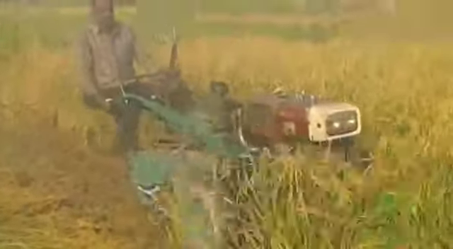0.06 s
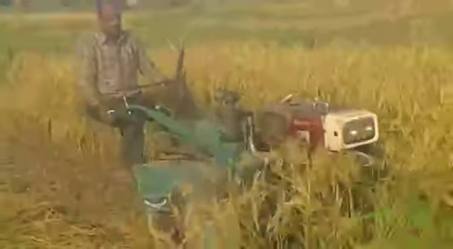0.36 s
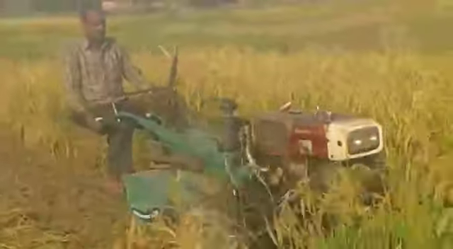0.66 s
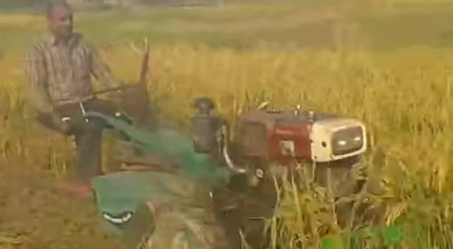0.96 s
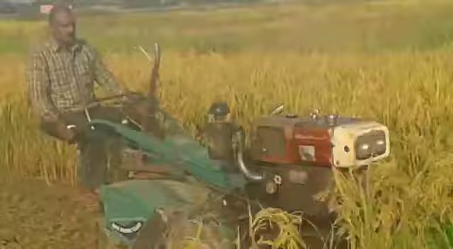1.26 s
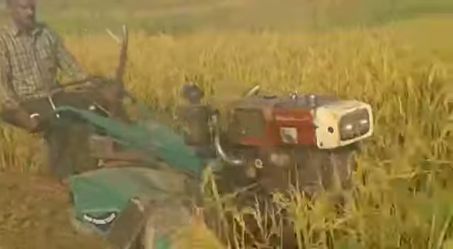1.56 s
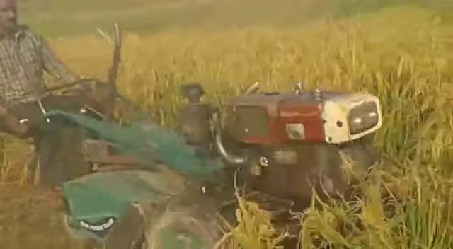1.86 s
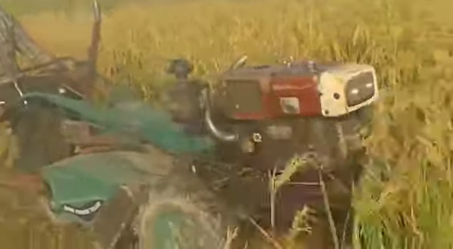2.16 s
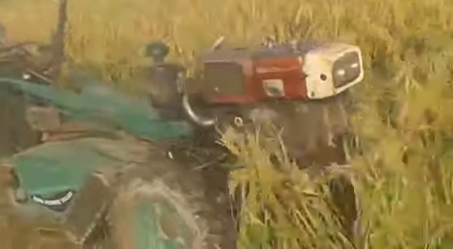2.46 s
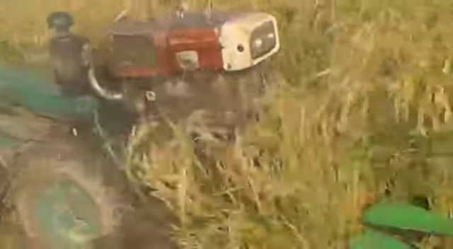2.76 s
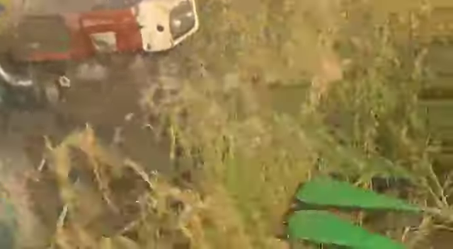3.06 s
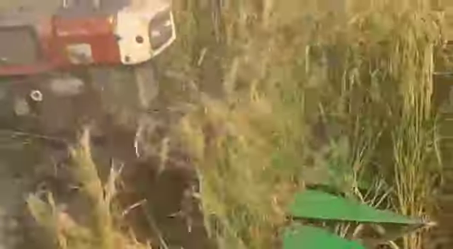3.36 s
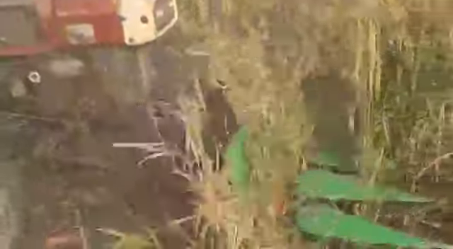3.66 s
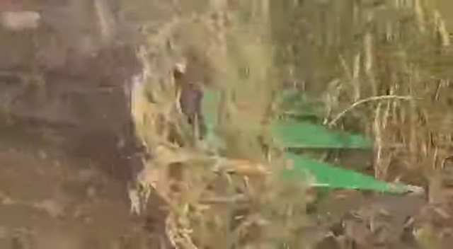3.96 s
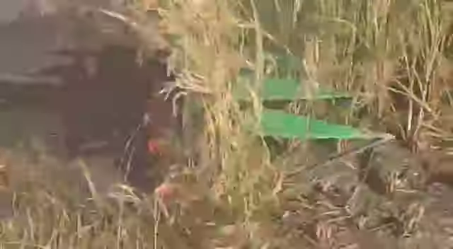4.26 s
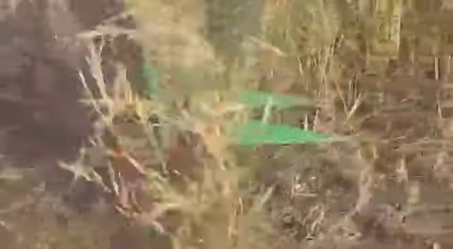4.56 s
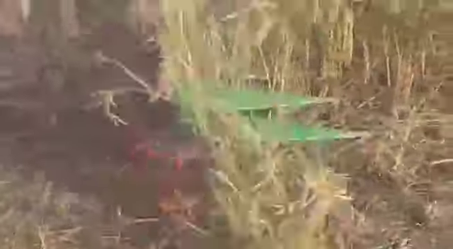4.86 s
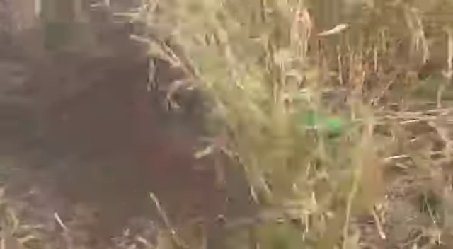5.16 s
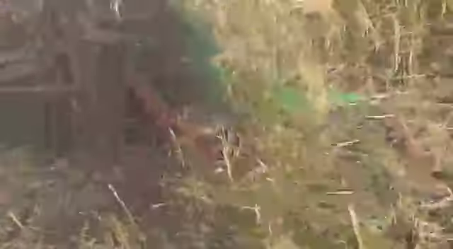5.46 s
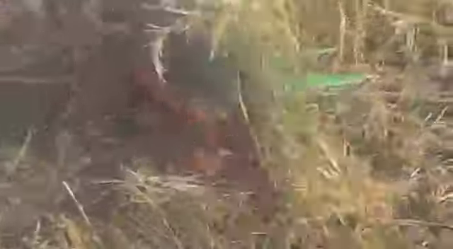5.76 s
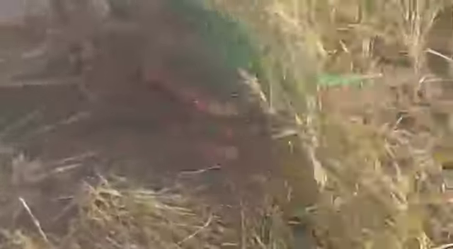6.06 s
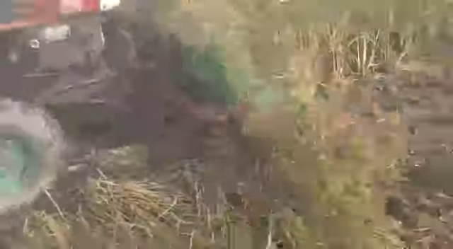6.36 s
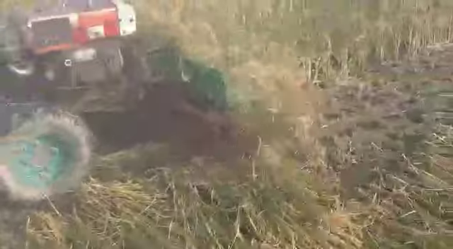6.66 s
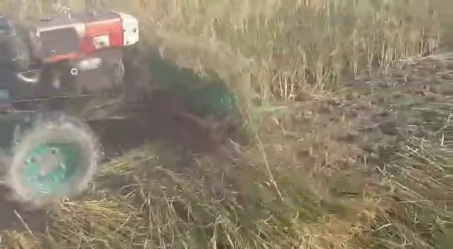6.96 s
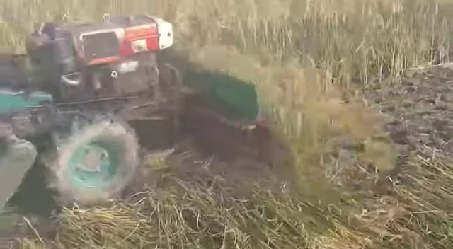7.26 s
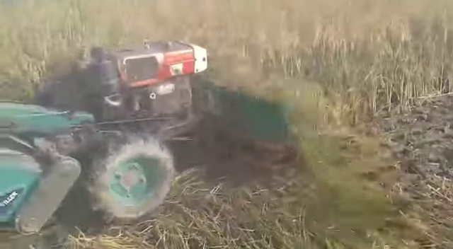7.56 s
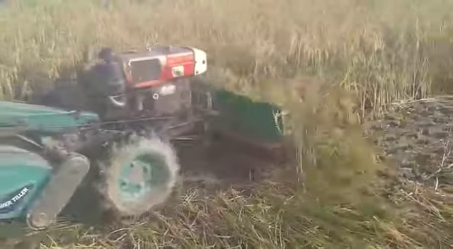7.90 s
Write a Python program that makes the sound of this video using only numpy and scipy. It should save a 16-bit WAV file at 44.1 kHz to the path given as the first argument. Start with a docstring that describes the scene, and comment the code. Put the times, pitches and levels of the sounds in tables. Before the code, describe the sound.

A single-cylinder diesel tiller runs steadily close by, its reaper blades chattering in a harsh metallic hiss with sharp clanks.

```python
"""Power tiller reaping, close by.

A single-cylinder diesel tiller drives a front reaper through standing crop past a phone, heard from
the front, the side, then the rear. Loose steel of the cutter and its drive chatters in step with the
engine and rings like a harsh hiss; each firing jolts it. Beneath, the exhaust thuds, the casing drones."""
import sys
import numpy as np
from scipy import signal
from scipy.fft import rfft, irfft, next_fast_len
from scipy.io import wavfile
from scipy.ndimage import uniform_filter1d, minimum_filter1d, map_coordinates

SR = 44100
rng = np.random.default_rng(int(sys.argv[2]) if len(sys.argv) > 2 else 0)


def store_wav(level_fs):
    """Save 16-bit WAV to argv[1]."""
    pcm = np.round(np.clip(np.atleast_2d(level_fs), -1, 1) * 32767)
    wavfile.write(sys.argv[1], SR, pcm.T.astype(np.int16))


N = 358533


# rattle bouts in each cycle: place/cycles, width/cycles, level/dB re steady chatter
RATTLE_BOUTS = [(.12, .02, -2), (.28, .03, -.5), (.415, .036, 4.5), (.67, .033, -3.5), (.82, .042, -2.3),
                (.955, .025, -1)]
# cutter bar and guard modes: f/Hz, width/Hz, level/dB at front, flank, rear quarter, rear
CUTTER_MODES = [(3049, 160, -18.5, -18.5, -14, -16.5), (3316, 547, -14.5, -10.5, -6.5, -18),
                (3900, 540, -10.5, -5, -7, -6.5), (4318, 630, 1, -0.5, 1, -7),
                (4600, 410, -10, -0.5, 1, -3.5), (4865, 240, -7, -5, 2, -1.5),
                (5130, 290, -3.5, -5.5, 3.5, -5.5), (5330, 710, -2, 1, 2, -1),
                (5850, 870, -2, -0.5, 2, -4.5), (6590, 910, -7, -4.5, -0.5, -8.5),
                (7625, 940, -8.0, -3.5, -4, -12), (8800, 2000, -14, -13, -9, -18.5),
                (10150, 1800, -22, -18, -15.5, -22.5), (11100, 3600, -18.5, -16, -17, -23.0)]
# cutter during the pass: t/s, level/dB
CUTTER_DB = [(0.1, -18.5), (1.21, -17.5), (1.46, -19), (2.1, -17), (4.42, -18), (5.0, -16), (5.69, -17.5),
             (6.18, -16), (8.1, -16.5)]

def cutter(cycle, bout_scatter_db=0.8, straw_db=-4, shielding_db=-1.8, full_hz=5200):
    """Steel parts chatter in bouts as the engine shakes them; straw rubs along the guards throughout."""
    bouts = np.zeros(N)
    for place, width, db in RATTLE_BOUTS:
        turn, offset = np.divmod(cycle - place + 1.5, 1)
        force = undb(db + bout_scatter_db * rng.standard_normal(256))[turn.astype(int)]
        bouts += force ** 2 * np.exp(-.5 * ((offset - .5) / width) ** 2)
    # from behind, the machine hides the bouts
    shake = 1 + bouts * undb(shielding_db * (view() - 0.5)) ** 2
    chatter = impacts(rate_hz=260, scatter_db=1.7, ring_s=0.003, order=6) + undb(straw_db) ** 2
    strength = np.sqrt(shake * chatter)

    def drive(hz):
        """Light, high-ringing parts follow every blow; heavier ones respond more evenly."""
        exponent = min(hz / full_hz, 1.05) ** 0.95
        return strength ** exponent * rng.standard_normal(N)

    return radiate(drive, CUTTER_MODES) * undb(curve(CUTTER_DB))


# hard slams of the drive: t/s, level/dB
DRIVE_SLAMS = [(0.4068, -21), (0.8594, -21.5), (0.9363, -22.5), (1.9964, -20), (2.2228, -19),
               (2.3037, -19.5), (2.5294, -19.5), (3.2924, -19), (3.5144, -19), (3.7447, -18.5),
               (3.895, -20), (4.4273, -19.5), (4.8833, -18), (7.0165, -20)]

def strokes(cycle, place=.385, jitter_cycles=.015, side_db=(-30.5, -30, -30, -31), scatter_db=4.5):
    """One uneven blow per engine cycle; a slam replaces the blow of its cycle."""
    turns = np.arange(int(cycle[-1]))
    late, force = rng.standard_normal((256, 2))[turns].T
    at = np.searchsorted(cycle, turns + place + jitter_cycles * late).clip(0, N - 1)
    db = np.interp(view()[at], np.arange(len(side_db)), side_db) + scatter_db * np.clip(force, -2, 1)
    for time_s, slam_db in DRIVE_SLAMS:
        turn = int(cycle[int(time_s * SR)])
        at[turn], db[turn] = int(time_s * SR), slam_db
    return np.bincount(at, undb(db), N)


# clank spectrum: f/Hz, relative level/dB
CLANK_SPECTRUM = [(1500, -36), (3200, -3), (4500, -16), (6000, 12.5), (7800, 13), (9800, 6), (12000, -4.5),
                  (15000, -17)]
# knife section tones: f/Hz, width/Hz, level/dB re crash
KNIFE_MODES = [(8950, 160, -18), (9680, 140, -18)]

def clanks(cycle, crack_s=0.00088, crack_db=-6, ring_s=0.016):
    """The slack of the drive snaps shut each stroke: a crack, a bright crash of steel, a faint clink."""
    age_s = np.arange(SR // 10) / SR
    decay = undb(crack_db) * np.exp(-age_s / crack_s) + np.exp(-age_s / ring_s)
    strength = signal.fftconvolve(strokes(cycle), decay)[:N]
    knots_hz, knots_db = np.transpose(CLANK_SPECTRUM)
    size = next_fast_len(N)
    bins_hz = np.fft.rfftfreq(size, 1 / SR)
    colour = undb(np.interp(np.log(bins_hz + 1), np.log(knots_hz), knots_db))
    ring = irfft(rfft(rng.standard_normal(size)) * colour, size)[:N]
    crash = strength * ring / np.std(ring)
    clink = sum(undb(db) * resonance(crash, hz, width) for hz, width, db in KNIFE_MODES)
    return crash + np.std(crash) * clink


# pipe and silencer modes: f/Hz, width/Hz, level/dB at front, flank, rear quarter, rear
EXHAUST_MODES = [(78, 40, -15.5, -15, -17, -15.5), (117, 41, -6.5, -7, -7.5, -8),
                 (163, 59, -5, -8, -9, -3.5), (213.4, 42, 1.5, -4, -4, -7), (274.4, 92, 1, -3, -1, -1),
                 (371, 163, 2, -1, -1, -0.5), (470, 102, -3.5, -1, -2, -9), (538, 58, -10.5, -4, -4, -5)]
# exhaust during the pass: t/s, level/dB
EXHAUST_DB = [(0.1, -34.5), (3.35, -37.5), (3.6, -35.5), (4.15, -41), (4.8, -38), (5.18, -40.5),
              (6.34, -37.5), (8.1, -37)]

def exhaust(cycle, place=.88, scatter_db=4.5, puff_cycles=0.093, flow=1.25, thud_db=-9, rebound_s=0.067):
    """The valve opens with a thud, then turbulent gas rushes through the silencer."""
    openings = np.diff(np.floor(cycle - place), prepend=np.floor(-place))
    pulses = openings * undb(scatter_db * rng.standard_normal(N))
    puff = flow + np.exp(-((cycle - place) % 1) / puff_cycles)
    lag_s = np.arange(SR // 12) / SR

    def drive(hz):
        """Gas noise plus the thud rebounding along the pipe."""
        rebound = rng.standard_normal(len(lag_s)) * np.exp(-lag_s / rebound_s)
        thud = signal.oaconvolve(pulses, rebound)[:N]
        gas = puff * rng.standard_normal(N)
        return undb(thud_db) * thud / np.std(thud) + gas / np.std(gas)

    return radiate(drive, EXHAUST_MODES) * undb(curve(EXHAUST_DB))


# block, tank and cover modes: f/Hz, width/Hz, level/dB at front, flank, rear quarter, rear
CASING_MODES = [(678, 330, -12.5, -14.5, -12.5, -13), (908, 310, -7, -10.5, -0.5, -1),
                (1154, 406, -1, -0.5, -0.5, -3), (1447, 390, -13, -7, 1.5, -4),
                (1874, 520, -14, -13.5, -8, -13.5), (2312, 600, -3.5, -5, -1, -2),
                (2754, 360, -12, -9, -5.5, -8), (2764, 76, -21, -21, -4, -8)]

def casing(cycle, throb_depth=0.065, place=0.89, level_db=-32.5):
    """Gears and valve train knock densely on the block, a little harder once a cycle."""
    knocks = np.sqrt(impacts(rate_hz=800, scatter_db=1.5, ring_s=0.0032))
    strength = knocks * (1 + throb_depth * np.cos(2 * np.pi * (cycle - place)))
    return radiate(lambda hz: strength * rng.standard_normal(N), CASING_MODES) * undb(level_db)


def low_rumble(hz=60, width_hz=44, level_db=-60):
    """A very faint, deep, uneven rumble around 60 Hz."""
    strength = np.sqrt(impacts(rate_hz=9, scatter_db=-0.5, ring_s=0.0054, order=6))
    return undb(level_db) * resonance(strength * rng.standard_normal(N), hz, width_hz)


def reflections(x, gain=.12):
    """Add weak ground and panel echoes; their paths shift during the pass and comb the ringing."""
    out = x
    for first_s, last_s in [(.0021, .0015), (.0029, .004), (.0058, .0045)]:
        delay = SR * np.linspace(first_s, last_s, N)
        out = out + gain * map_coordinates(x, [np.arange(N) - delay], order=1)
    return out


# listener bearing: t/s, side (0 front, 1 flank, 2 rear quarter, 3 rear)
LISTENER_SIDE = [(0, 0), (1.3, 0), (2.3, 1), (4.4, 1), (5.2, 2), (6.8, 2), (7.4, 3), (8.13, 3)]

def view():
    """Side of the machine facing the listener, per sample."""
    return curve(LISTENER_SIDE)


def radiate(drive, modes):
    """Ring each mode with drive(hz), beamed by side; hold the sum at unit RMS over 0.5 s."""
    side = view()
    total = np.zeros(N)
    for hz, width_hz, *side_db in modes:
        beam = np.interp(side, np.arange(len(side_db)), undb(side_db))
        total += beam * resonance(drive(hz), hz, width_hz)
    return total / np.sqrt(uniform_filter1d(total ** 2, size=SR // 2) + 1e-18)


def resonance(x, hz, width_hz):
    """Two band-passes in series, unit RMS out."""
    b, a = signal.iirpeak(min(hz, .45 * SR), hz / width_hz, fs=SR)
    y = signal.sosfilt([np.r_[b, a]] * 2, x)
    return y / np.std(y)


def impacts(rate_hz, scatter_db, ring_s, order=3):
    """Energy of small decaying impacts, mean 1; a higher order spaces them more evenly."""
    gaps_s = rng.gamma(order, 1 / order, 20000) / rate_hz
    size = undb(scatter_db * np.clip(rng.standard_normal(len(gaps_s)), -2, 2))
    at = (np.cumsum(gaps_s) * SR).astype(int)
    hits = np.bincount(at[at < N], size[at < N] ** 2, N)
    energy = signal.lfilter([1], [1, -np.exp(-1 / (ring_s * SR))], hits)
    return energy / energy.mean()


def curve(table):
    """Rows of (t/s, value), interpolated per sample."""
    return np.interp(np.arange(N) / SR, *np.transpose(table))


def undb(db):
    """Decibels to gain."""
    return 10 ** (np.asarray(db) / 20)


# engine speed under load: t/s, firing rate/Hz
FIRING_HZ = [(0.0, 13.251), (1.5, 13.168), (2.2, 13.211), (3.7, 13.147), (5.0, 13.143), (6.0, 13.214),
             (7.3, 13.136), (8.1, 13.088)]

def scene():
    """One crankshaft times the machine; the open field has no reverberation."""
    cycle = np.cumsum(curve(FIRING_HZ)) / SR
    pipe = exhaust(cycle)
    metal = casing(cycle) + cutter(cycle)
    mono = pipe + low_rumble() + reflections(metal + clanks(cycle))
    return np.array([mono, mono])


def record(dry, ceiling=.64, window_samples=45, top_hz=15000):
    """Mono phone microphone: fast peak limiter, then a steep low-pass."""
    allowed = ceiling / np.maximum(np.abs(dry[0]), ceiling)
    gain = uniform_filter1d(minimum_filter1d(allowed, window_samples), window_samples)
    lowpass = signal.ellip(12, .2, 90, top_hz, fs=SR, output="sos")
    return signal.sosfilt(lowpass, dry * gain)


dry = scene()
out = record(dry)
store_wav(out)
```